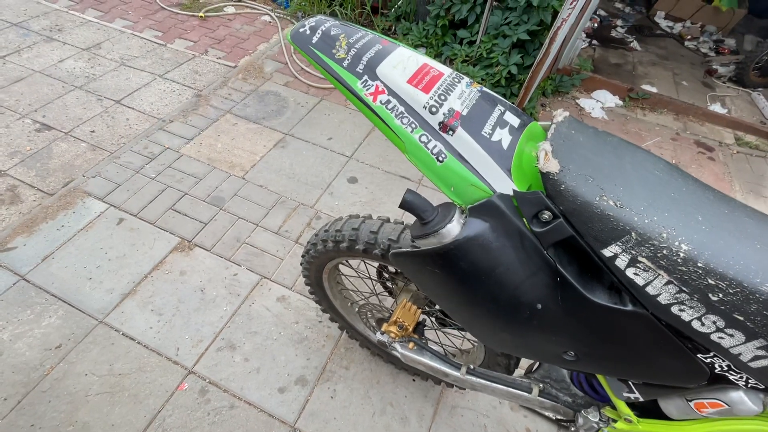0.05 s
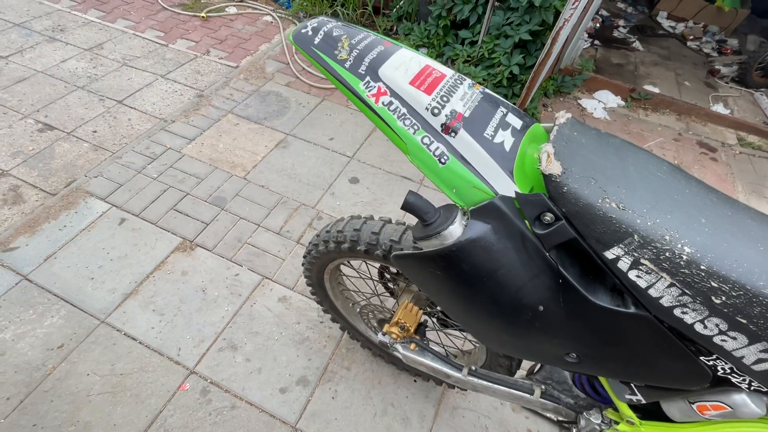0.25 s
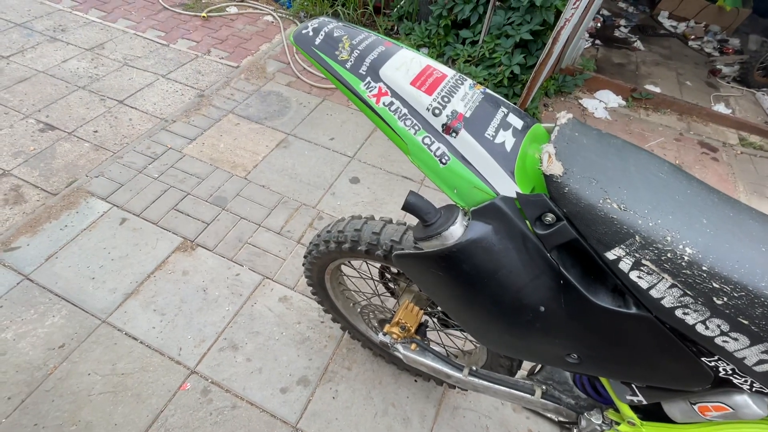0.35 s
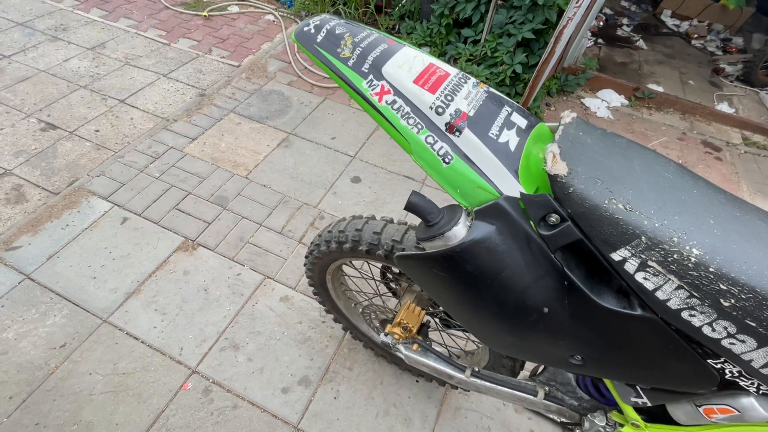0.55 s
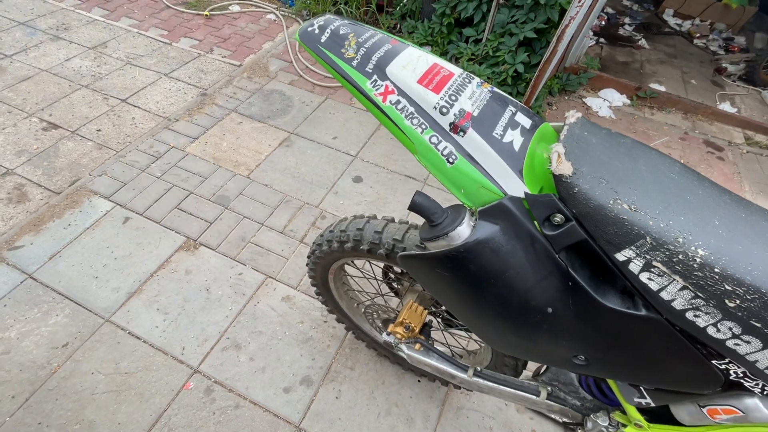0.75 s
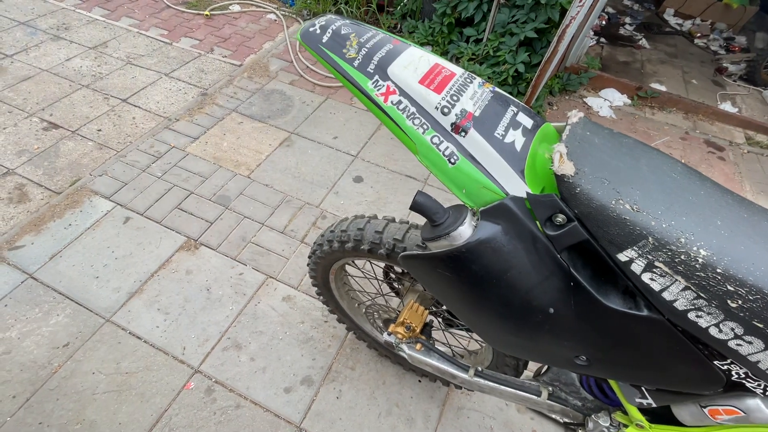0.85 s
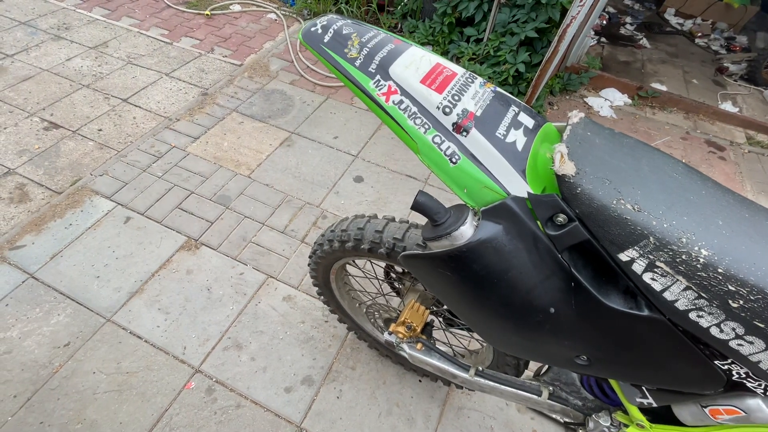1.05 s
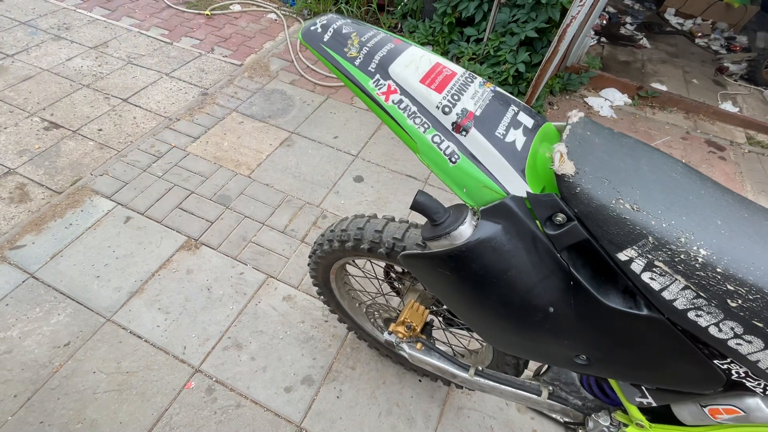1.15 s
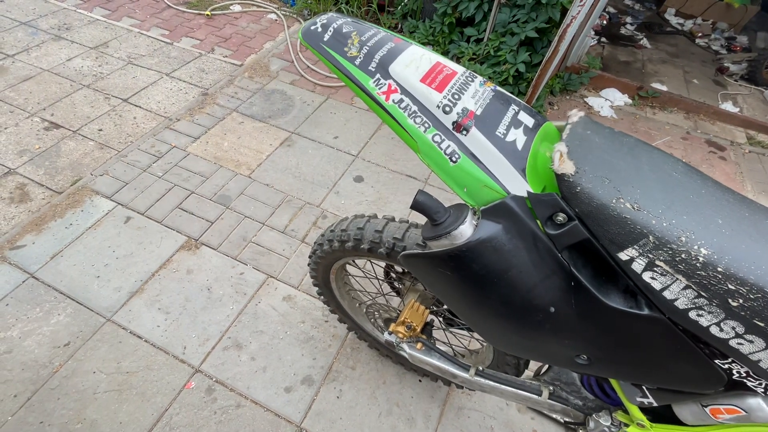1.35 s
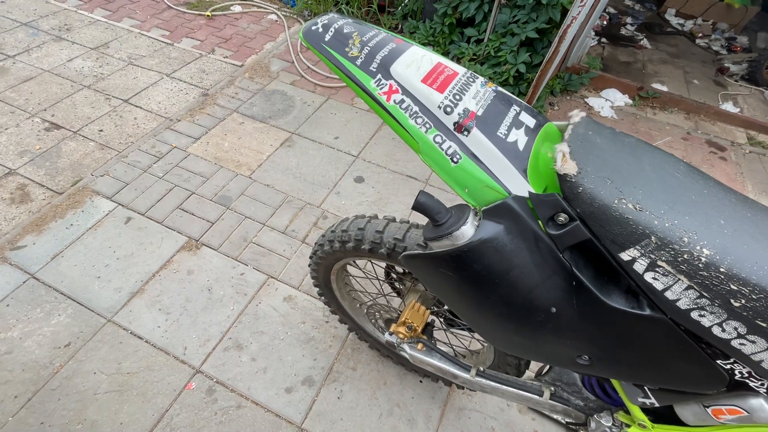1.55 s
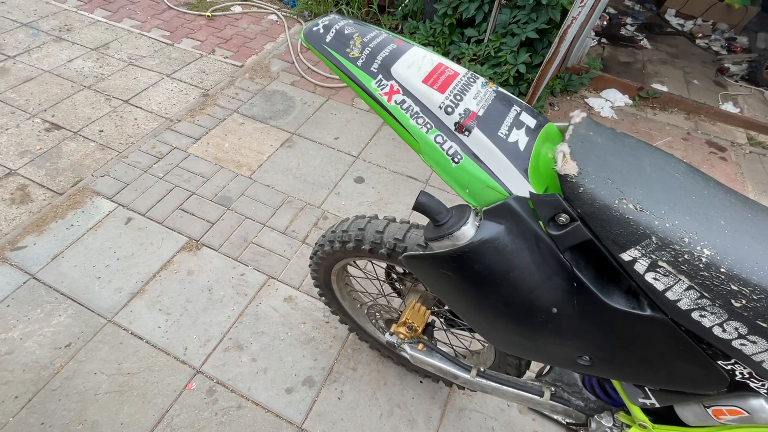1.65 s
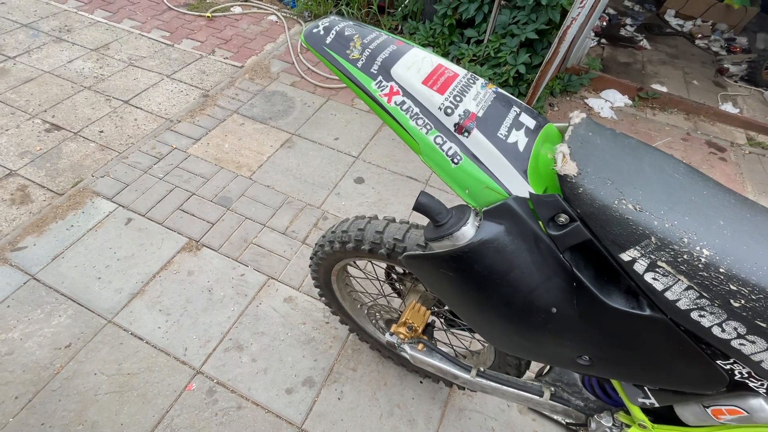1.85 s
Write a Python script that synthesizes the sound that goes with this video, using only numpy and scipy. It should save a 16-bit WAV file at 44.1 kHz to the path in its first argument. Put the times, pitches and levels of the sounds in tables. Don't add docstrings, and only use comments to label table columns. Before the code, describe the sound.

A small two-stroke motorcycle engine, close to the tailpipe in a paved yard. Uneven soft idle pops until 0.24 s, then a crackling rev climbs to about 0.5 s. The throttle shuts and a droning, rattling coast-down follows. An intake howl swells from 1.0 s into a second, higher, abrupt raspy burst at 1.1-1.3 s, then the pitch falls to the end over airy hiss.

```python
import sys
import numpy as np
from scipy import signal
from scipy.fft import rfft, irfft
from scipy.io import wavfile
from scipy.ndimage import uniform_filter1d

SR = 44100
rng = np.random.default_rng(int(sys.argv[2]) if len(sys.argv) > 2 else 0)


def transcribe(signal):
    frames = np.atleast_2d(signal).T
    limited = np.clip(frames, -1, 1)
    pcm = np.round(limited * 32767).astype(np.int16)
    wavfile.write(sys.argv[1], SR, pcm)


def how_loud(loudness_db):
    steps = np.asarray(loudness_db, float) / 20
    return 10 ** steps


N = 83790
T = np.arange(N) / SR
HZ = np.maximum(np.arange(N // 2 + 1) * SR / N, 1)


def rms_one(x):
    return x / np.sqrt(np.mean(x ** 2) + 1e-20)


def at_hz(points, hz):
    table_hz, value = np.transpose(points)
    return np.interp(np.log(hz), np.log(table_hz), value)


def drift(rate_hz):
    r = np.exp(-80 * np.pi * rate_hz / SR)
    noise = rng.standard_normal(N // 40 + 2002)
    slow = signal.lfilter([1], [1, -2 * r, r * r], noise)[2000:]
    return np.interp(np.arange(N) / 40, np.arange(len(slow)), rms_one(slow))


def soften(x, time_s):
    r = np.exp(-1 / (time_s * SR))
    return signal.lfilter([(1 - r) ** 2], [1, -2 * r, r * r], x)


def band(x, low_hz, high_hz):
    return signal.sosfilt(signal.butter(2, [low_hz, high_hz], "band", fs=SR, output="sos"), x)


def resonate(x, peaks):
    out = 0
    for k, (hz, width_hz, db) in enumerate(peaks):
        r = np.exp(-np.pi * width_hz / SR)
        zeros = np.array([1, 0, -1]) * (1 - r * r) / 2
        poles = [1, -2 * r * np.cos(2 * np.pi * hz / SR), r * r]
        out = out + (-1) ** k * how_loud(db) * signal.lfilter(zeros, poles, x + 1e-18)
    return out


def train(s, size):
    out = np.zeros(N + SR)
    np.add.at(out, (s * SR).astype(int), size)
    return out[:N]


# pitch_hz, likeness (-1 to 1)
LIKENESS = [(60, 1), (500, 0.026), (1400, -0.091), (4000, 0.13), (9500, -0.31), (11200, 1), (12300, 0.92),
            (15000, -2)]


def wide_noise(spectrum):
    mid, side = rfft(rng.standard_normal((2, N)))
    alike = np.clip(at_hz(LIKENESS, HZ), -1, 1)
    gain = how_loud(at_hz(spectrum, HZ)) * (HZ > spectrum[0][0]) * (HZ < spectrum[-1][0])
    both = np.sqrt(1 + alike) * mid + np.sqrt(1 - alike) * side * [[1], [-1]]
    return rms_one(irfft(gain * both, N))


# catch_s, shut_s, catch_burn_db, shut_burn_db
BLIPS = [
    (.243, .505, 0, 1),
    (1.094, 1.30, 8, -4.5),
]


def burn(s):
    fall_s = 0.014
    out = 0
    for catch, shut, catch_db, shut_db in BLIPS:
        level = how_loud(np.interp(s, [catch, shut], [catch_db, shut_db]))
        out = out + (s >= catch - .002) * level * np.exp(-np.maximum(s - shut, 0) / fall_s)
    return out


# time_s, speed_turns_per_s
SPEED = [(.24, 46.5), (.312, 57), (.382, 71), (.43, 81.5), (.475, 99), (.5, 106.5), (.59, 106.3),
         (.87, 92.2), (1.05, 84.5), (1.09, 87.5), (1.12, 89), (1.18, 113), (1.225, 126.5), (1.27, 132.3),
         (1.33, 132.5), (1.45, 124.5), (1.67, 110), (1.9, 98.5)]
# time_s, level_db
LOAD = [(0.24, -14), (0.332, -11), (0.382, -10.5), (0.47, -10.5), (0.498, -18), (0.53, -47), (0.928, -26.5),
        (1.03, -25), (1.082, -26.5), (1.096, -6.5), (1.16, -10.5), (1.22, -13.5), (1.28, -12.5),
        (1.298, -25.5), (1.348, -24.5), (1.45, -25), (1.636, -28.5), (1.9, -31)]


def crank():
    speed = np.interp(T, *np.transpose(SPEED))
    load_db = np.interp(T, *np.transpose(LOAD))
    turns = np.cumsum(speed) / SR
    first, second = np.interp([CRACKING[0][0], CRACKING[1][0]], T, turns)
    slip = np.round(second - first) - (second - first)
    turns = turns - first + slip * np.interp(T, [BLIPS[0][1], BLIPS[1][0]], [0, 1])
    return speed, load_db, turns


def street():
    return how_loud(-55) * wide_noise([(30, -19), (70, 23), (170, 25), (220, -4)])


# left_delay_s, right_delay_s, level_db
WALLS = [(.0031, 0.0028, -15), (0.012, 0.013, -13), (0.025, .019, -15), (.037, 0.052, -17)]


def yard(x):
    dull = band(x, 433, 4040)
    ears = []
    for ear, side in ((0, 0.97), (1, -1.03)):
        echoes = sum(how_loud(w[2]) * side * np.interp(T - w[ear], T, dull, left=0) for w in WALLS)
        ears.append(x + echoes)
    return np.array(ears)


# pitch_hz, level_db per Hz
BURBLE = [(24, -53), (40, -24), (183, -15), (353, -14), (384, -29), (500, -22), (650, -61), (1100, -120)]


def burble():
    fade = np.clip((0.67 - T) / 0.063, 0, 1)
    return how_loud(-32 + 4.3 * drift(43)) * wide_noise(BURBLE) * fade


# pitch_hz, level_db per Hz
HISS = [(180, -11), (300, -10.5), (353, -10), (474, -6.5), (700, -20), (1020, -6), (9490, -23.5),
        (12300, -34.5), (15000, -38)]


def hiss(speed):
    speed_db = 5.5 * np.log2(speed / 100)
    return how_loud(-29 + speed_db + 2.34 * drift(14.7)) * wide_noise(HISS)


# pitch_hz, width_hz, level_db
CASES = [(786, 32, 8), (1134, 95, -2.5), (1220, 410, -50.5), (1560, 30, 3), (2310, 330, -5)]


def cases(speed, turns):
    throb = 1 + 0.38 * np.cos(2 * np.pi * turns)
    rattle = rms_one(resonate(throb * wide_noise([(300, 0), (6000, 0)]), CASES))
    speed_db = 1.5 * np.log2(speed / 100)
    return how_loud(-35 + speed_db + 0.43 * drift(21)) * rattle


# centre_s, length_s, pitch_hz, level_db
SWELLS = [(0.837, 0.069, 93, -9), (0.76, .07, 328, -13.5), (.78, 0.064, 635, -25), (0.576, 0.017, 860, 8),
          (0.925, 0.17, 850, 8.5), (1.34, 0.061, 735, 21.5), (1.9, 0.043, 810, 9.5), (1.5, 0.063, 464, 14),
          (1.86, 0.1, 197, -13), (0.85, 0.3, 386, -33), (.68, 0.055, 290, 2.5), (1.46, 0.022, 760, -25),
          (1.344, 0.044, 1090, 10), (1.618, 0.046, 733, 14.5), (1.05, 0.034, 440, 14),
          (0.61, 0.055, 1230, 7.5), (1.72, 0.036, 410, 10), (0.564, .04, 123, 8.5)]


def swell(hz):
    width_octaves = 0.12
    gain_db = 0
    for centre, length, at, db in SWELLS:
        away = ((T - centre) / length) ** 2 + (np.log2(hz / at) / width_octaves) ** 2
        gain_db = gain_db + db * np.exp(-away)
    return gain_db


# pitch_hz, level_db
DRONE = [(90, -37.5), (125, -31.5), (220, -49.5), (320, -39.5), (450, -39.5), (600, -43.5), (830, -36),
         (1700, -44.5)]
# multiple, level_db
ORDER_LEAN = [(1, -0.5), (2, 7), (3, 6.5), (4, -1), (5, 1.5), (6, -2.5), (7, -3.5), (9, -6)]


def drone(speed, turns):
    start = rng.uniform(0, 2 * np.pi, 40)
    out = 0
    for k in range(1, 19):
        wander_db = 1.6 * min(k / 4, 1) * drift(5.9)
        level_db = at_hz(DRONE, k * speed) + at_hz(ORDER_LEAN, k) + swell(k * speed) + wander_db
        out = out + how_loud(level_db) * np.sin(2 * np.pi * k * turns + start[k])
    fade_in = np.clip((T - .3) / 0.05, 0, 1)
    return np.sqrt(2) * out * how_loud(5 * np.log2(speed / 100)) * fade_in


def whine(speed, turns):
    load = uniform_filter1d(burn(T), size=600)
    return how_loud(-24) * load * speed / 100 * np.sin(2 * np.pi * 9 * turns)


# time_s, level_db
HOWL = [(1.009, -32), (1.04, -22), (1.064, -18.5), (1.092, -16), (1.11, -22), (1.13, -55)]


def howl(turns):
    s, db = np.transpose(HOWL)
    level = how_loud(np.interp(T, s, db, left=-120, right=-120))
    return np.sqrt(2) * level * np.sin(2 * np.pi * (3 * turns + 0.24))


def port(x):
    soft = soften(x + 1e-18, 0.0013 / 4)
    return signal.sosfilt(signal.butter(3, 79, "high", fs=SR, output="sos"), soft)


# pitch_hz, width_hz, level_db
PIPE = [(108, 116, -7), (247.3, 47.3, 1.5), (414, 29, 4), (618, 144, -12), (792.7, 37, 1)]
# pitch_hz, width_hz, level_db
CHAMBER = [(104, 16, 2.5), (357, 70, -0.5)]
# start_s, pipe_db, burn_db, chamber_db
IDLE = [(.008, -36, -22, -30), (0.043, -50, -37, -37), (0.0748, -38, -12.5, -24.5), (.110, -38, -31, -39),
        (0.147, -39, -38, -49), (.175, -24.5, -24, -22), (0.199, -20.5, -23, -17.5), (0.223, -18, -36, -28)]


def thumps(s, luck, speed, load_db):
    lag_turns, lead_s, return_s = 0.4113, 0.00488, 0.003413
    turn_speed = np.interp(s, T, speed)
    power = np.maximum(how_loud(np.interp(s, T, load_db)) ** 2 - how_loud(-26) ** 2, 0)
    scale = np.sqrt(SR / np.sum(resonate(port(train(np.array([0.]), 1)), PIPE) ** 2))
    size = np.sqrt(power / turn_speed) * how_loud(0.7 * luck) * scale
    low = how_loud(-7 * np.log2(turn_speed / speed[0]))
    late = s + lag_turns / turn_speed - lead_s
    idle_s, pipe_db, _, chamber_db = np.transpose(IDLE)
    idle = scale / np.sqrt(speed[0])
    into_pipe = train(late, size) + train(idle_s, how_loud(pipe_db) * idle)
    into_chamber = train(late, size * low) + train(idle_s, how_loud(chamber_db) * idle)
    thump = resonate(port(into_pipe), PIPE) - resonate(port(into_chamber), CHAMBER)
    returned = np.interp(T - return_s, T, thump, left=0)
    return how_loud(-2) * (thump + returned)


def puffs(s, luck):
    idle_s, _, idle_burn_db, _ = np.transpose(IDLE)
    fired = train(s, burn(s) * how_loud(3 * luck)) + train(idle_s, how_loud(idle_burn_db))
    decay_s = 0.0066
    puff = signal.lfilter([1], [1, -np.exp(-1 / (decay_s * SR))], fired) + 0.44 * burn(T)
    return soften(puff, 0.00056 / 2)


def rumble(puff, speed):
    deep = rms_one(band(rng.standard_normal(N), 20, 65))
    flow = uniform_filter1d(puff, size=800)
    return how_loud(-35) * deep * flow * how_loud(-18 * np.log2(speed / 60))


# pitch_hz, level_db per Hz
BLAST = [(530, 3), (900, -3.5), (1780, -8), (3440, -14.5), (3830, -17), (7760, -19), (9590, -14),
         (12400, -25.5), (15000, -31)]


def blast(puff):
    return how_loud(-24) * puff * wide_noise(BLAST)


# pitch_hz, width_hz, level_db
CRACK = [(750, 330, 3), (1190, 300, -1), (2140, 1500, -31.5)]
# first_s, last_s, first_db, last_db
CRACKING = [
    (.2438, .51, -10, 0),
    (1.0952, 1.292, 0, 0),
]
# time_s, loss_db
MISFIRES = [(.265, -5), (.284, -7), (.5065, -5), (1.259, -14), (1.274, -13), (1.2815, -6)]


def cracks(s, luck):
    size = 0
    for first, last, first_db, last_db in CRACKING:
        level = how_loud(np.interp(s, [first, last], [first_db, last_db]))
        size = size + (s >= first - .002) * (s < last) * level
    loss_db = sum(db * (np.abs(s - at) < .003) for at, db in MISFIRES)
    idle_s, _, idle_burn_db, _ = np.transpose(IDLE)
    fired = train(s, size * how_loud(loss_db + 1.8 * luck)) + train(idle_s, how_loud(idle_burn_db))
    soft = signal.sosfilt(signal.butter(3, 2500, fs=SR, output="sos"), fired + 1e-18)
    snap_peak = [(1550, 1400, 0)]
    snap = how_loud(8) * resonate(resonate(soft, snap_peak), snap_peak)
    ring = resonate(signal.lfilter([.3], [1, -.7], fired), CRACK)
    lean_db = 8 * np.array([[.5], [-.5]])
    sides = how_loud(-24.5) * 60 * (snap - ring) * how_loud(lean_db)
    middle = sides.mean(axis=0)
    return yard(middle) + sides - middle


def exhaust(speed, load_db, turns):
    k = np.arange(int(turns[-1]))
    luck = rng.standard_normal((400, 3))[:len(k)]
    s = np.interp(k + 0.006 * luck[:, 0] * (k > 0), turns, T)
    puff = puffs(s, luck[:, 2])
    pulses = thumps(s, luck[:, 1], speed, load_db) + rumble(puff, speed)
    return pulses, cracks(s, luck[:, 2]), blast(puff)


def scene():
    speed, load_db, turns = crank()
    pulses, crack, gas = exhaust(speed, load_db, turns)
    tones = drone(speed, turns) + whine(speed, turns) + howl(turns)
    background = street() + burble() + hiss(speed) + cases(speed, turns)
    return background + yard(pulses + tones) + crack + gas


def top_cut(x):
    return signal.sosfilt(signal.butter(12, 16010, fs=SR, output="sos"), x)


# pitch_hz, width_hz, depth (0 to 1)
NOTCHES = [(3334, 780, 0.65), (7820, 480, 0.4)]
# pitch_hz, level_db
LEAN = [(40, 0), (110, -8), (300, -2), (1200, 1), (5000, 0.5), (7500, 3.5), (9500, -16), (12000, 5)]


def record(dry):
    dips = 1
    for hz, width_hz, depth in NOTCHES:
        dips = dips * (1 - np.clip(depth, 0, .95) / (1 + ((HZ - hz) / width_hz * 2) ** 2))
    lean = how_loud(at_hz(LEAN, HZ) * [[.5], [-.5]])
    x = irfft(rfft(dry) * dips * lean, N)
    return top_cut(1.085 * np.tanh(x / 1.04))


dry = scene()
out = record(dry)
transcribe(out)
```